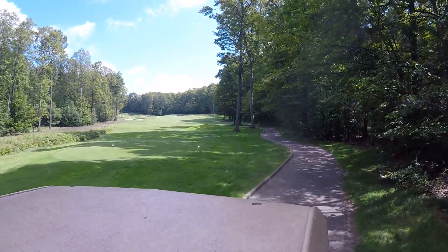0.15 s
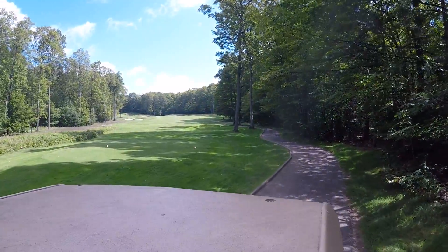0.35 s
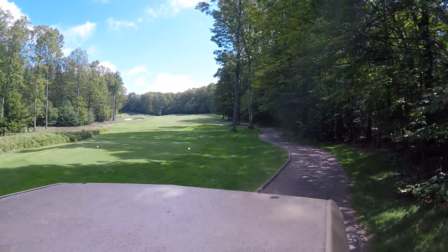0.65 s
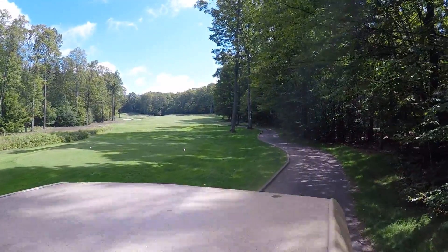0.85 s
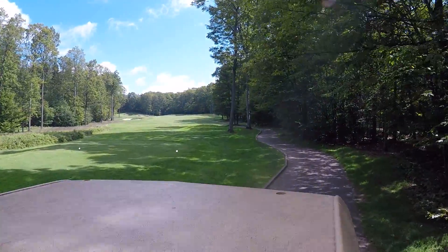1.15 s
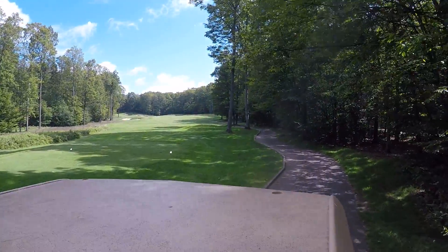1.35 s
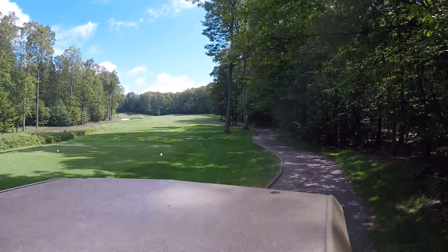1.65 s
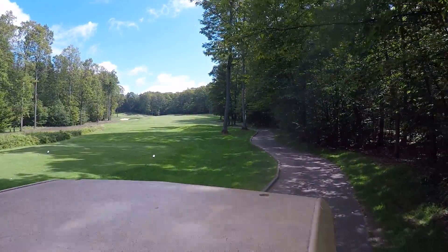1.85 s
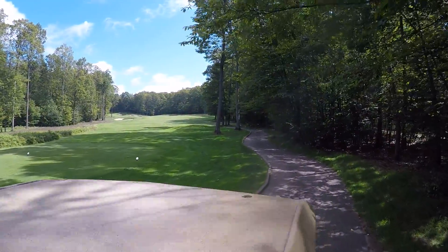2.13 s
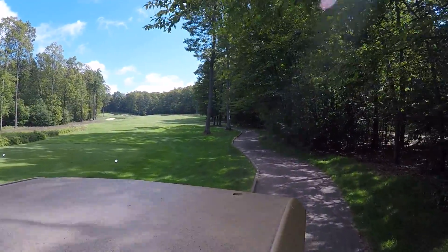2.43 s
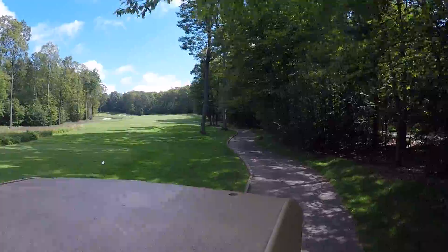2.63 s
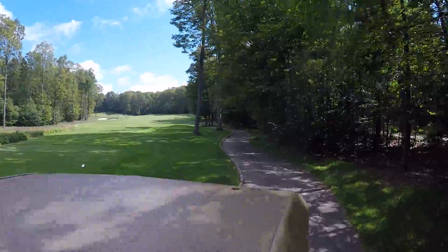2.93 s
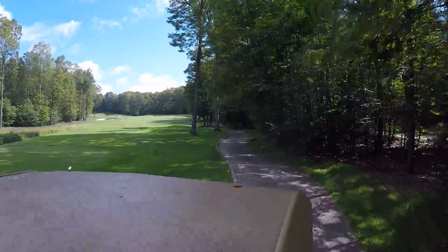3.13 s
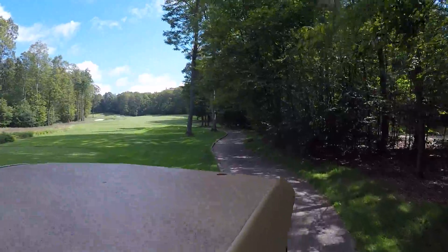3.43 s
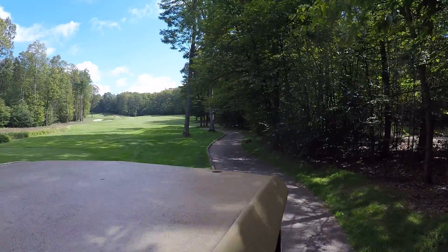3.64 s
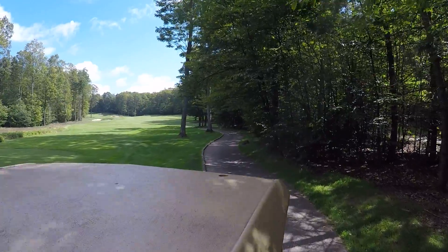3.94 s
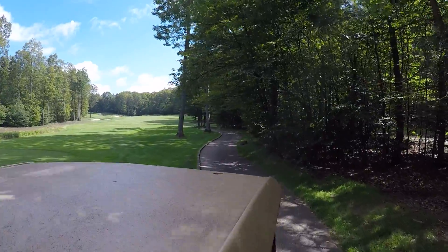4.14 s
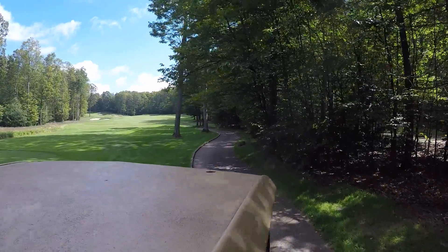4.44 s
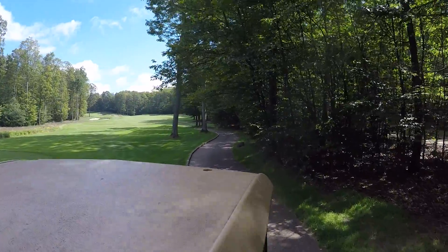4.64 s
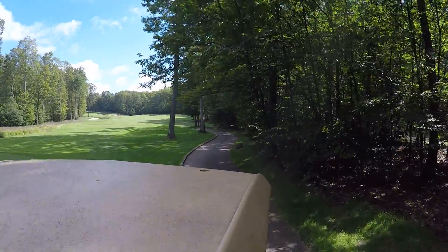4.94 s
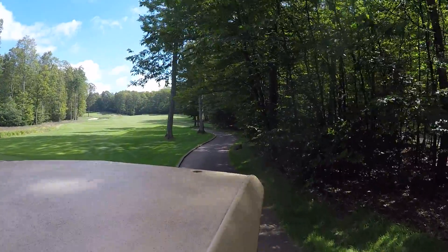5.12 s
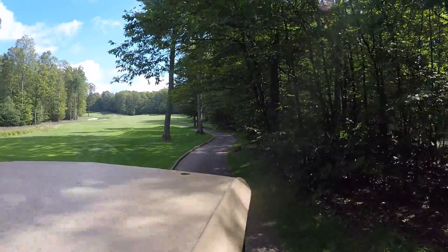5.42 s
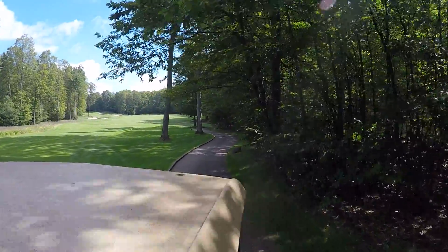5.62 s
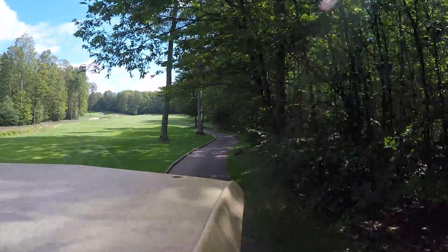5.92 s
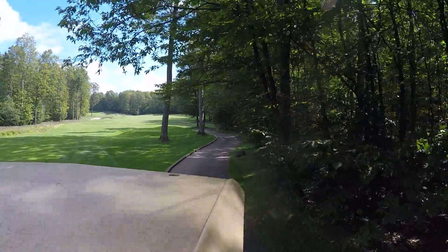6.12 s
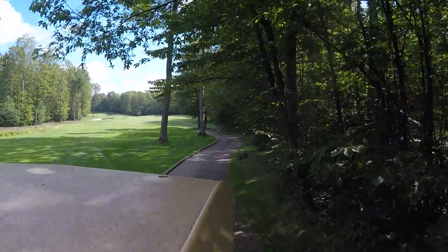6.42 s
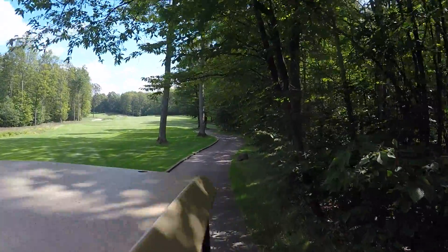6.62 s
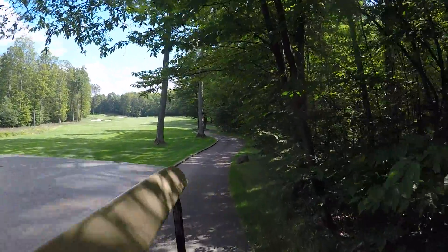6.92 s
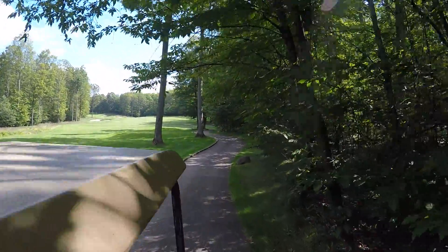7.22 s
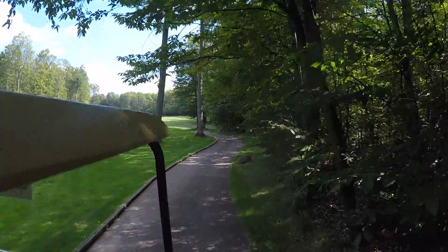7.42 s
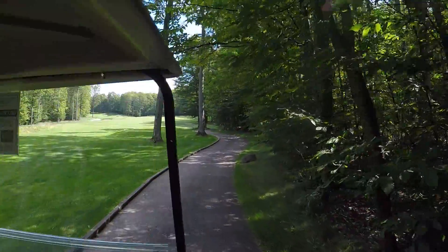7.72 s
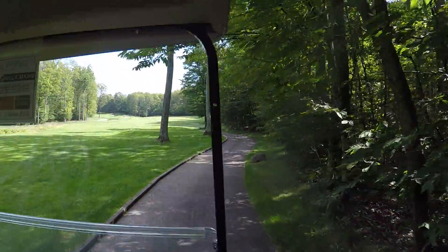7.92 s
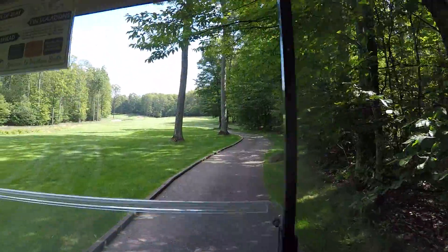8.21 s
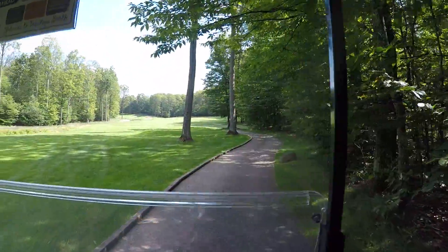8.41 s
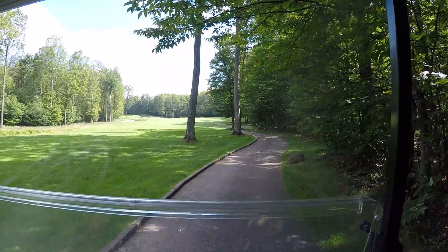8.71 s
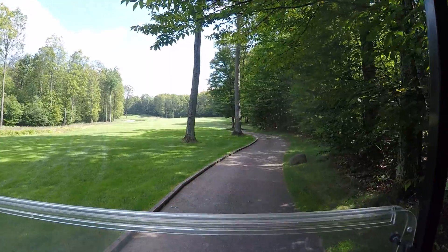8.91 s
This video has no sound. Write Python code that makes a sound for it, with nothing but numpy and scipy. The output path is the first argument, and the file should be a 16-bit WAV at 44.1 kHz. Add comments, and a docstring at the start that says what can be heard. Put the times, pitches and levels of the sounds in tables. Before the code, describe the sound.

Close, muffled engine throb with low wind and tyre rumble along a paved path, then coasting, slower thumps and sharp metallic pedal clacks.

```python
"""A one-cylinder four-stroke engine thumps close by, under wind on the microphone, as a cart rolls along
a paved path; tyre rumble, belt hiss and thin gear whines lie around it. The throttle shuts and the cart
coasts and slows; the microphone comes down under the roof and the brake pedal clacks near the end.
Strokes ring banks of dying sines once a cycle, whines are sines, wind, tyres and hiss are coloured noise.
The microphone sits in a closed case, which cuts notches."""
import sys
import numpy as np
from scipy import signal
from scipy.fft import rfft, irfft
from scipy.io import wavfile
from scipy.ndimage import uniform_filter1d

SR = 44100
rng = np.random.default_rng(int(sys.argv[2]) if len(sys.argv) > 2 else 0)


def invert_db(x):
    """Field ratio 10**(x/20) for x, a level in decibels (scalar or array-like)."""
    u = np.asarray(x, float) / 20
    return 10 ** u


def wav_out(sig):
    """Save sig, one row per channel (or a flat mono array), as 16-bit PCM at SR to the path in sys.argv[1]."""
    wavfile.write(sys.argv[1], SR, np.round(np.clip(np.atleast_2d(sig).T, -1, 1) * 32767).astype(np.int16))


N = 399546

# Intake pulse, which also drives the valve noise: level in dB at the throttle shut, light, part and wide.
INTAKE_LEVEL = [-23.5, -19.5, -10, -7]


def evened(x):
    """Scales to rms 1."""
    return x / np.sqrt(np.mean(x ** 2) + 1e-20)


def curve(rows, column):
    """One column of a table, drawn as straight lines through the times in its first column."""
    rows = np.asarray(rows)
    return np.interp(np.arange(N) / SR, rows[:, 0], rows[:, column])


def noise(points, size, patchy_db, frames_wide, bins_wide):
    """Noise of rms 1 from random short-time spectra of a given colour with drifting patches."""
    hz = np.fft.rfftfreq(size, 1 / SR)
    f, db = np.transpose(points)
    real, imaginary, patches = rng.standard_normal((4 * N // size + 5, len(hz), 3)).T
    patches = uniform_filter1d(patches, bins_wide, 0)
    patches = evened(uniform_filter1d(patches, frames_wide, 1))
    colour = np.interp(np.log(hz + 1), np.log(f + 1), db, left=-120, right=-120)
    spectra = (real + 1j * imaginary) * invert_db(colour[:, None] + patchy_db * patches)
    return evened(signal.istft(spectra, nperseg=size, noverlap=3 * size // 4)[1][:N])


def ring(modes, rise_s):
    """Struck modes: sines with a soft start, each dying by 60 dB in its t60."""
    t = np.arange(8192) / SR
    sines = sum(invert_db(db - 60 * t / t60) * np.sin(2 * np.pi * hz * t) for hz, db, t60 in modes)
    return (1 - np.exp(-t / rise_s)) * sines


def cycle_rate():
    """Engine speed in four-stroke cycles per second, two crank turns each."""
    # Each row: time in seconds, cycles per second.
    speed = [(0.0, 19.24), (1.0, 21.08), (1.4, 21.43), (2.3, 21.46), (3.2, 20.12), (3.6, 20.04),
             (4.55, 21.11), (5.1, 20.5), (5.75, 20.09), (6.3, 17.14), (7.4, 13.54), (8.4, 10.67),
             (9.06, 7.39)]
    return curve(speed, 1)


def turns():
    """Engine cycles done, counted from the place in the cycle at the start."""
    return .815 + np.cumsum(cycle_rate()) / SR


def kicks(delay, spread_db):
    """One impulse a cycle at the given place in it, of uneven strength."""
    cycle = np.floor(turns() - delay).astype(int)
    strength = invert_db(spread_db * rng.standard_normal(400))
    return (np.diff(cycle, prepend=cycle[0]) > 0) * strength[cycle]


def law(values, per=0):
    """A quantity set by the throttle, plus per for each cycle per second below cruising speed."""
    # Each row: time in seconds, throttle opening from 0 shut to 1 wide.
    throttle = [(0, 1), (1.65, 1), (1.8, .67), (2.45, .67), (2.6, .33), (3.47, .33), (3.53, 1), (4.48, 1),
                (4.56, .67), (5.72, .67), (5.78, 0), (9.06, 0)]
    # Throttle shut, light, part and wide: opening from 0 to 1.
    openings = [0, .33, .67, 1]
    cruise = 21  # cycles per second; above it the drift reverses
    return np.interp(curve(throttle, 1), openings, values) + per * (cruise - cycle_rate())


def lowered():
    """0 with the microphone above the roof, 1 under it and nearer the engine."""
    # Start and end of the move, in seconds.
    move = (7.2, 8.17)
    return np.interp(np.arange(N) / SR, move, (0, 1))


def strokes():
    """Exhaust and intake pulses begin as suction; compression pushes just before the top of the cycle."""
    # What each stroke rings, and the body panels knocked by each exhaust pulse.
    # Each row: frequency in Hz, level in dB, t60 in seconds.
    exhaust_modes = [(114.54, 8.5, 0.09), (39.8, -13, 0.11), (182.4, -19.5, 0.33)]
    panel_modes = [(205, -24, .1), (255, -21, .12), (290, -25, .12), (322, -22, .15), (375, -28, .12)]
    intake_modes = [(113.2, 7, 0.091), (45, -8, 0.027), (145, -27.5, 0.011), (259.5, -22.5, 0.074)]
    compression_modes = [(64.8, 12.5, 0.044), (124, -1.5, 0.0033)]
    # Pulse levels at the throttle shut, light, part and wide, in dB, before the drift with speed.
    exhaust_level = [-17.5, -12, -11, -11]
    compression_level = [-13.5, -26, -23, -35]
    # Place of the pulses at the same four openings, in cycles, before the drift with speed.
    exhaust_place = [0.0806, 0.038, 0.043, 0.0582]
    intake_place = [.46, 0.5125, 0.5104, .49]
    exhaust = ring(exhaust_modes, .0035) + ring(panel_modes, .0008)
    exhaust_db = law(exhaust_level, -1.05) + 12.5 * lowered()  # louder under the roof
    lead = .003 * cycle_rate()  # in cycles: the push needs a few ms to peak
    pulses = [(-exhaust, exhaust_db, law(exhaust_place, .01068)),
              (-ring(intake_modes, .0045), law(INTAKE_LEVEL), law(intake_place)),
              (ring(compression_modes, .003), law(compression_level, -.15), -lead)]
    return sum(signal.oaconvolve(kicks(place, 1.0) * invert_db(db), shape)[:N] for shape, db, place in pulses)


def crank_shake():
    """The crank shakes the cart at its turning rate and at twice that: two low sines."""
    # Throttle shut, light, part and wide: rms level in dB before the drift with speed.
    single_level = [-28, -25, -27.5, -25.5]
    double_level = [-42, -41, -28, -23.5]
    single = np.sqrt(2) * np.cos(4 * np.pi * (turns() - 1 / 3))
    double = np.sqrt(2) * np.cos(8 * np.pi * (turns() - 1 / 8))
    return invert_db(law(single_level, -1.07)) * single + invert_db(law(double_level, -6)) * double


def valves():
    """Loose parts rattle on the cylinder head, most of all as the intake shuts and its valve seats."""
    # Each row: frequency in Hz, level in dB, t60 in seconds.
    head_modes = [(2501, 14.5, 0.018), (2374, -3, 0.038), (2640, -5.5, 0.045), (1503, 1, 0.051),
                  (3180, -5, 0.055), (5950, 3, 0.013)]
    # Each row: time in seconds, level in dB.
    clatter_level = [(0, -50), (1.0, -56.5), (1.6, -67), (2.3, -49), (2.7, -51.5), (3.03, -54),
                     (3.36, -52.5), (3.6, -45), (4.1, -51.5), (4.52, -48), (4.9, -52), (5.8, -47.5),
                     (6.1, -57), (7.4, -53.5), (8.1, -66), (9.06, -73)]
    intake_half_db = law(INTAKE_LEVEL) / 2
    burst = signal.oaconvolve(kicks(.5, 1.5), np.exp(-np.arange(2000) / SR / .005))[:N]
    shaking = 1 + invert_db(15 + intake_half_db) * burst
    clatter = rng.standard_normal(N) * (rng.random(N) < 9000 / SR)  # 9000 random taps a second
    seating = invert_db(27 + intake_half_db) * kicks(.5, 1.5)
    rattle = signal.oaconvolve(shaking * clatter + seating, ring(head_modes, .00039))[:N]
    return invert_db(curve(clatter_level, 1)) * evened(rattle)


def wind():
    """Lumpy low gusts on the microphone, over a breeze that the roof holds off once it is lowered."""
    # Each row: frequency in Hz, density in dB per Hz.
    wind_colour = [(8, -8), (20, 0), (35, -2), (55, -6), (80, -14), (120, -24), (170, -36), (300, -60)]
    # Each row: time of the peak in seconds, level there in dB over no breeze, half length in seconds.
    gusts = [(.42, -18, .15), (1.05, -21, .2), (2.95, -18, .08), (3.2, -19, .07), (3.6, -21, .15),
             (5.85, -19, .08), (6.33, -17, .05), (6.6, -16, .18), (8.2, -27, .2)]
    t = np.arange(N) / SR
    breeze = invert_db(-23 - 7 * lowered())
    swells = sum(invert_db(db) * np.exp(-((t - s) / half) ** 2) for s, db, half in gusts)
    return (breeze + swells) * noise(wind_colour, size=4096, patchy_db=1.5, frames_wide=4, bins_wide=3)


def tyres():
    """Rumble of the tyres on the paving, through the body: low noise that weakens at lower speed."""
    # Each row: frequency in Hz, density in dB per Hz.
    tyre_colour = [(60, -30), (110, -12), (170, -2), (250, -3), (330, -7), (400, -14), (460, -28),
                   (560, -50)]
    # Throttle shut, light, part and wide: level in dB before the drift with speed.
    tyre_level = [-35, -33, -33.5, -30.5]
    rumble = noise(tyre_colour, size=2048, patchy_db=1, frames_wide=4, bins_wide=4)
    return invert_db(law(tyre_level, -.47)) * rumble


def hiss():
    """Belt, air and grit: broad noise, throbbing very slightly with each crank turn."""
    # Each row: frequency in Hz, density in dB per Hz.
    hiss_colour = [(280, -22.5), (480, 1), (571, 11.5), (605, -4.5), (741, -2), (989, -9), (1110, -11.5),
                   (1480, -5.5), (2040, -9), (2460, -9), (3580, -14.5), (4080, -12), (6210, -11.5),
                   (10100, -24.5), (15200, -46.5)]
    # Each row: time in seconds, level in dB.
    hiss_level = [(0, -42), (1.6, -42.5), (2.4, -40), (3.1, -41.5), (3.6, -39.5), (4.5, -39.5), (5.8, -42),
                  (6.3, -44), (9.06, -45)]
    throb = 1 + .017 * np.cos(4 * np.pi * (turns() - .55))
    steady = noise(hiss_colour, size=512, patchy_db=.96, frames_wide=12, bins_wide=7)
    return invert_db(curve(hiss_level, 1)) * throb * steady


def whines():
    """Fan or gear teeth: faint sines on multiples of the cycle rate, wavering."""
    # Each row: multiple of the cycle rate, level in dB before the waver about halves it,
    # start in seconds, end in seconds.
    whine_rows = [(12, -36, -.2, 2.5), (12, -39, 2.5, 7.6), (15, -36, -.2, 2.6), (42, -53, 6.2, 8.2),
                  (54, -53, 7.3, 8.3), (48, -54, 6.8, 7.3), (60, -54, 7.75, 8.25), (30, -46, 7.2, 7.8)]
    t, out = np.arange(N) / SR, np.zeros(N)
    for multiple, db, start, end in whine_rows:
        drift = noise([(1, .0094), (6, .0043)], size=16384, patchy_db=1.5, frames_wide=1, bins_wide=1)
        waver = .5 + .12 * drift
        fade = np.clip(np.minimum(t - start, end - t) / .12, 0, 1)
        tone = np.sqrt(2) * np.sin(2 * np.pi * multiple * turns())
        out += invert_db(db) * fade * waver * tone
    return out


def axle():
    """Axle gear: one sine of slowly moving pitch, faded out over the last 0.4 s of its table."""
    # Each row: time in seconds, frequency in Hz, rms level in dB before the fade.
    axle_rows = [(0, 377, -44.5), (1, 382.2, -45), (1.8, 389.5, -34.5), (2.5, 386, -44.5),
                 (3.1, 370.6, -39), (4, 362, -41), (5.1, 347.1, -38)]
    fade = np.clip((axle_rows[-1][0] - np.arange(N) / SR) / .4, 0, 1)
    phase = 2 * np.pi * np.cumsum(curve(axle_rows, 1)) / SR
    return np.sqrt(2) * fade * invert_db(curve(axle_rows, 2)) * np.sin(phase)


def squeaks():
    """Thin squeaks of the belt: narrow noise that throbs with the engine cycle."""
    # Each row: start in seconds, end in seconds, centre in Hz, level in dB before fades and throb.
    squeak_rows = [(2.056, 2.28, 3235, -55.5), (3.66, 3.85, 3220, -58)]
    t, out = np.arange(N) / SR, np.zeros(N)
    for start, end, hz, db in squeak_rows:
        band = noise([(hz - 30, 0), (hz + 30, 0)], size=2048, patchy_db=0, frames_wide=1, bins_wide=1)
        fade = np.clip(np.minimum(t - start, end - t) / .031, 0, 1)
        out += invert_db(db) * fade * band
    return out * (1 + .6 * np.cos(2 * np.pi * (turns() - .55)))


def pedal():
    """The latch rattles and rings in a quick swell and decay, knocks the floor pan and leaves an airy fizz."""
    # Each row: time in seconds, rattle level at the peak in dB, rise in seconds, t60 in seconds,
    # knock level in dB, fall in dB per octave squared away from the centre of the rattle.
    clacks = [(7.597, -30.5, 0.0028, 0.19, -32, 7), (8.324, -36.5, 0.006, 0.061, -35, 4),
              (8.458, -16.5, 0.0075, 0.15, -19, 0.34), (9.019, -19.5, 0.0077, 0.09, -33, 5),
              (9.032, -18, 0.003, 0.052, -33, 11)]
    # Colours of the rattle and of the fizz. Each row: frequency in Hz, density in dB per Hz
    # (the rattle's before the fall).
    rattle_colour = [(300, 25), (1000, 7.5), (1400, 4), (2100, 5), (3500, 1.5), (4200, 4), (5800, 3.5),
                     (7400, 1), (8600, 1), (10500, -10.5), (15000, -20)]
    fizz_colour = [(6000, 1), (8500, -8), (9500, 2), (10700, -6.5), (12000, -21)]
    # Floor pan and latch metal. Each row: frequency in Hz, level in dB (the latch's before the fall),
    # t60 in seconds.
    pan_modes = [(248, 1, 0.15), (313.4, -1.5, 0.29), (378, -21, 0.042), (651, -4.5, 0.092),
                 (938, -9.5, 0.17), (1066, 0, 0.06), (1880, -5, 0.063)]
    latch_modes = [(2050, -2, .035), (2570, -4, .03), (3870, -4, .035), (4050, -2, .05), (4480, -3, .05),
                   (5500, -3, .04), (5800, -2, .035), (6700, -4, .035), (7450, -7, .035), (8400, -10, .03)]
    centre_hz, taps_per_s = 4170, 1500
    t, out = np.arange(N) / SR, np.zeros(N)
    fizz = noise(fizz_colour, size=256, patchy_db=3.5, frames_wide=8, bins_wide=3)
    taps = rng.standard_normal(N) * (rng.random(N) < taps_per_s / SR)
    for s, db, rise, t60, knock_db, fall_db in clacks:
        swell, after = np.exp(np.minimum(t - s, 0) / rise), np.maximum(t - s, 0)
        shape = swell * invert_db(db - 60 * after / t60)
        # the fall stops growing 1.1 octaves above the centre
        colour = [(hz, level - fall_db * min(np.log2(hz / centre_hz), 1.1) ** 2)
                  for hz, level in rattle_colour]
        out += shape * noise(colour, size=256, patchy_db=2, frames_wide=6, bins_wide=3)
        out += swell * invert_db(knock_db - 31.5 - 60 * after / 1.5) * fizz
        modes = [(hz, level - fall_db * np.log2(hz / centre_hz) ** 2, ring_s)
                 for hz, level, ring_s in latch_modes]
        metal = ring(modes, .00018)
        metal = metal / np.linalg.norm(metal) * np.sqrt(SR / taps_per_s)  # steady taps give rms 1
        out += invert_db(-7) * signal.oaconvolve(shape * taps, metal)[:N]
        knock = invert_db(knock_db) * ring(pan_modes, .0023)
        part = out[round((s - rise) * SR):][:len(knock)]
        part += knock[:len(part)]  # adds into out
    return out


def scene():
    """All sources, summed at the microphone as one channel."""
    engine = strokes() + crank_shake() + valves()
    rolling = wind() + tyres() + hiss()
    tones = whines() + axle() + squeaks()
    return (engine + rolling + tones + pedal())[None]


def closed_case(dry):
    """The closed case cuts resonant notches into what reaches the microphone."""
    # Each row: centre in Hz, width in Hz, depth from 0 (no cut) to 1 (full cut).
    notches = [(547, 276, 1), (576, 31, 1), (1101, 86, 0.8), (3370, 130, 0)]
    hz = np.fft.rfftfreq(N + SR, 1 / SR)
    response = np.prod([1 - depth / (1 + 2j * (hz - f) / width) for f, width, depth in notches], axis=0)
    return irfft(rfft(dry, N + SR) * response, N + SR)[:, :N]


def self_noise():
    """Faint treble hiss of the microphone itself."""
    # Each row: frequency in Hz, density in dB per Hz.
    mic_colour = [(7000, -5), (10000, 1), (12500, -5), (15300, -12)]
    return invert_db(-72.5) * noise(mic_colour, size=512, patchy_db=2, frames_wide=8, bins_wide=8)


def input_stage(x):
    """Rounds off the largest peaks; only the bass is large enough to saturate."""
    knee = .8  # of full scale
    slow = uniform_filter1d(x, size=31)
    return x - slow + knee * np.tanh(slow / knee)


def low_pass(x):
    """Removes everything above the highest recorded frequency."""
    return signal.sosfilt(signal.butter(12, 15360, fs=SR, output="sos"), x)


def record(dry):
    """The microphone in its case, with its own hiss, into the input stage."""
    mix = input_stage(closed_case(dry) + self_noise())
    return low_pass(mix)


dry = scene()
out = record(dry)
wav_out(out)
```